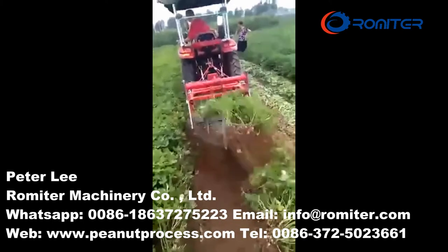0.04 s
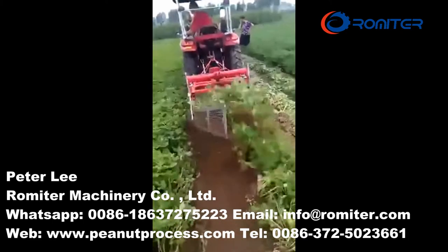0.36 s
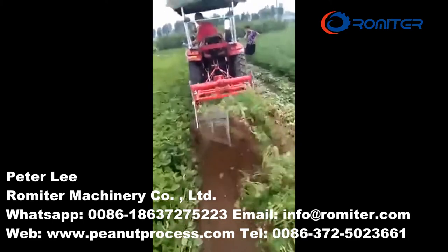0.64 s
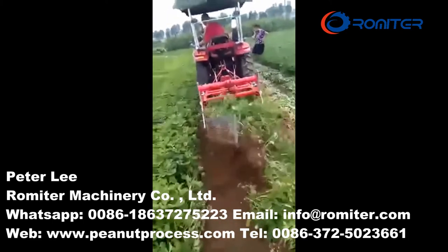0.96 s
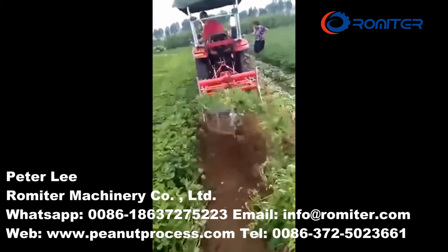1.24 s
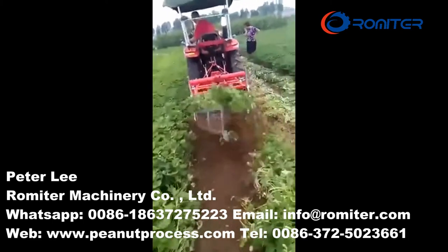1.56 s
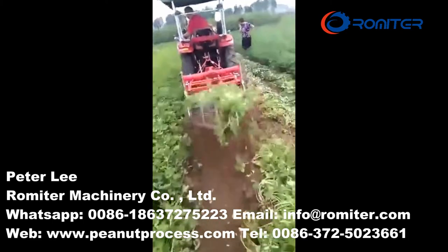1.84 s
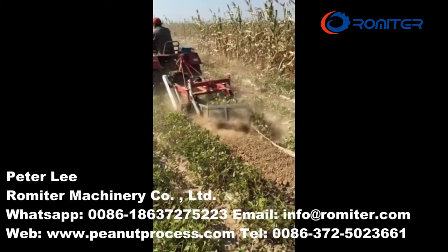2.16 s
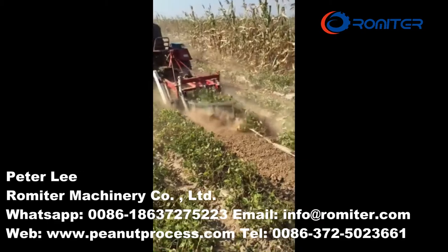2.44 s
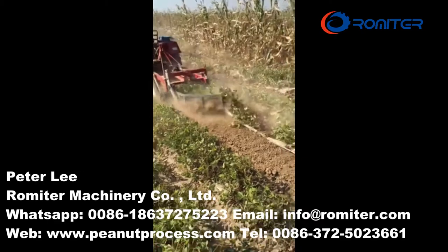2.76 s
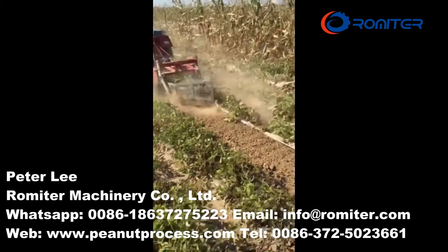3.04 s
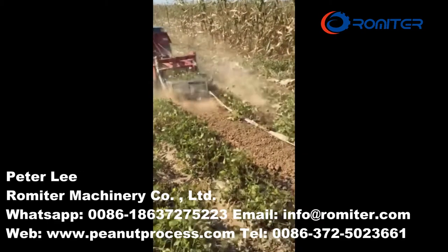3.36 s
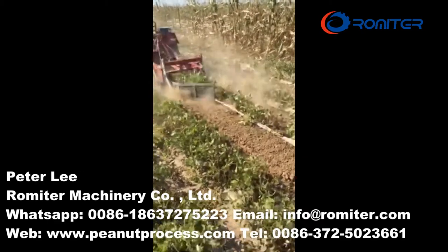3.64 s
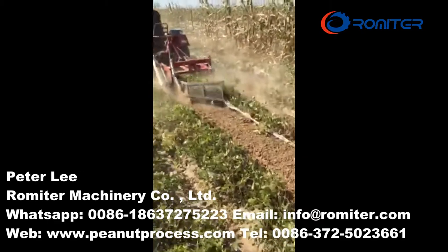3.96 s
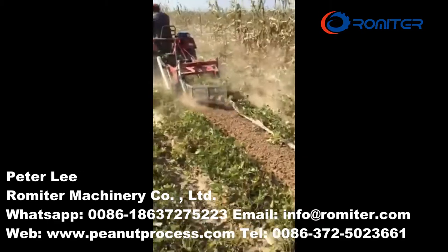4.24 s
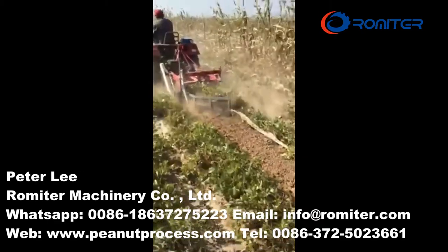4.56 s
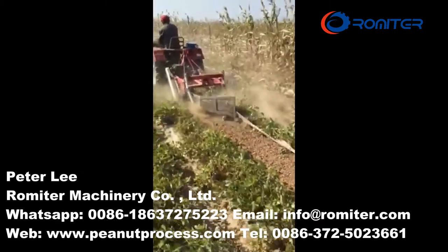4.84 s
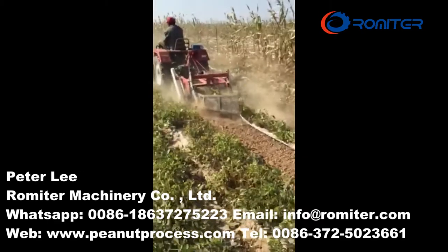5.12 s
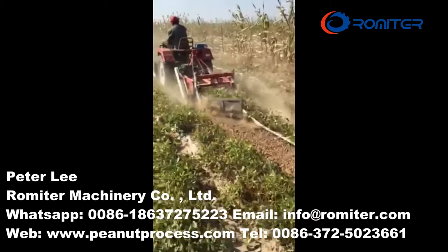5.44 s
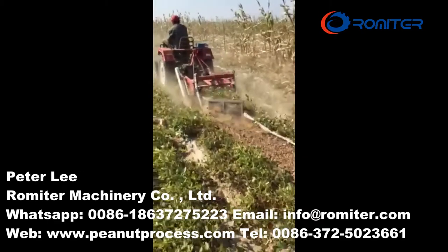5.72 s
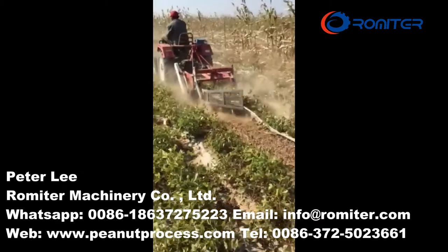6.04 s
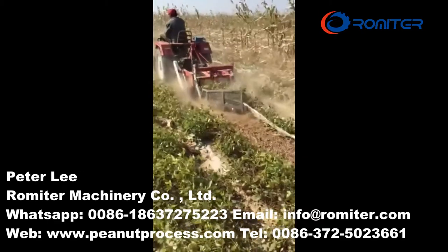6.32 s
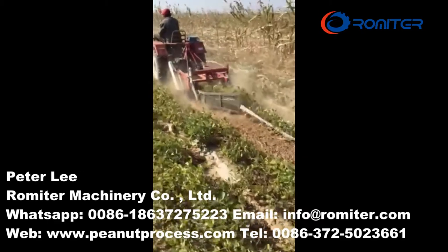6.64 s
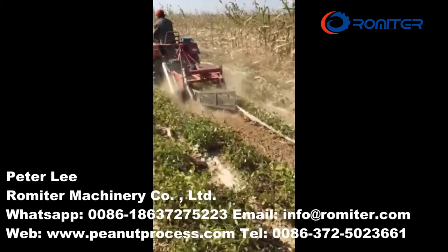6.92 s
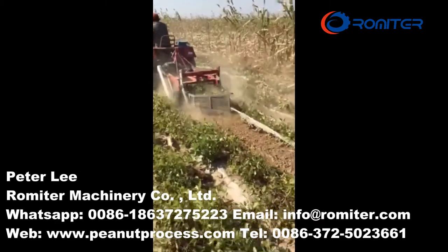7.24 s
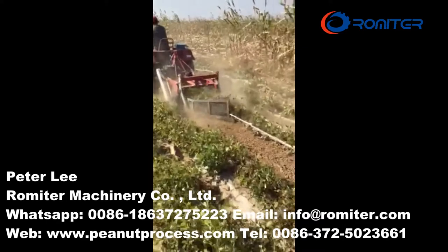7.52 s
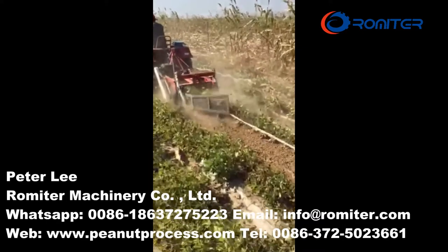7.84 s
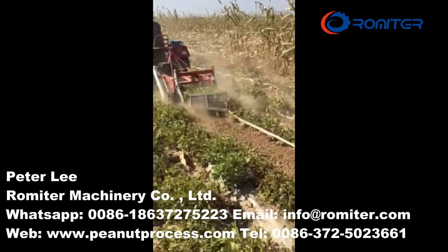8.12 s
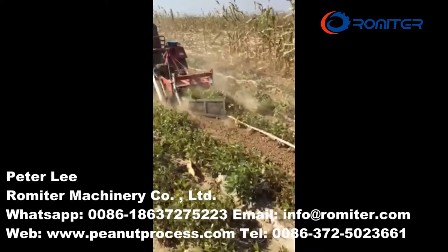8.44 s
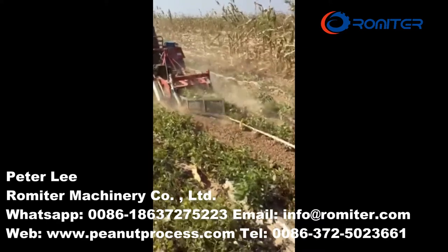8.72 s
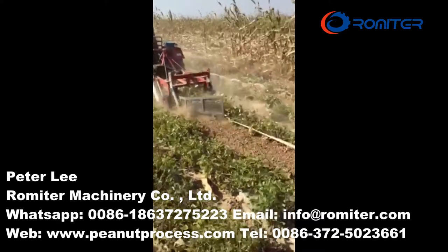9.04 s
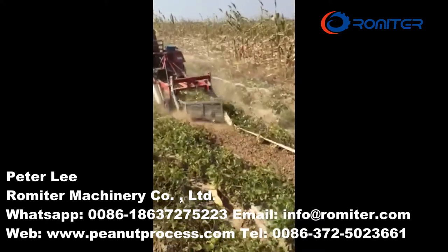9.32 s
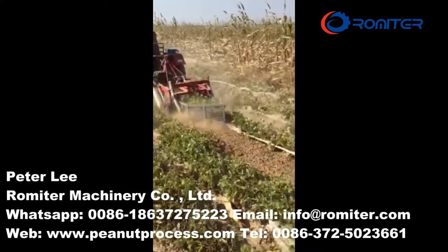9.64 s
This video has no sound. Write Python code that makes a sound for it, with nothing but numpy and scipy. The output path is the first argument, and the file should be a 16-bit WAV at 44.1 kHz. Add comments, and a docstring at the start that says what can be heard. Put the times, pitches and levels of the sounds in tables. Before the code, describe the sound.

A tractor-drawn digger rattles rhythmically over a droning diesel, cuts out briefly, then another rattles over a chugging engine and wind.

```python
"""Peanut diggers in two fields

A tractor drags a peanut digger through a green field; after a short silence, another works a dry one.
A steel sieve swings to and fro about four times a second: loose rods rattle and ring, soil hisses through.
In the green field steel squeals and a fast diesel drones. In the dry field the diesel chugs on one
cylinder, stones knock on the frame and wind buffets the microphone."""
import sys
import numpy as np
from scipy import signal
from scipy.fft import rfft, irfft
from scipy.io import wavfile
from scipy.ndimage import uniform_filter1d

SR = 44100
rng = np.random.default_rng(int(sys.argv[2]) if len(sys.argv) > 2 else 0)


def master(y):
    """Save y as 16-bit WAV."""
    cut = np.clip(np.atleast_2d(y).T, -1, 1)
    pcm = np.round(cut * 32767)  # scale
    wavfile.write(sys.argv[1], SR, pcm.astype(np.int16))


N = 435708
T = np.arange(N) / SR
HZ = np.maximum(np.arange(N // 2 + 1) * SR / N, 1)
GREEN_END_S, DRY_START_S = 1.982, 2.139
# a crank drives each sieve at a steady pace: (time of one forward turn/s, length of a swing/s)
GREEN_CRANK, DRY_CRANK = (0.0256, 0.2236), (2.268, 0.22933)

# Levels in the tables are relative: the functions set how loud each sound ends up.
# the load on the sieve sets how hard it turns at each end: (t/s, forward level/dB, return level/dB)
GREEN_LOAD = [(0, -24.5, -29), (0.33, -25, -28.5), (0.6, -26.5, -28.5), (0.92, -25, -25.5),
              (1.25, -25.5, -29), (1.45, -25.5, -27.5), (1.68, -30, -30.5), (1.85, -26.5, -28.5)]
DRY_LOAD = [(2.25, -19.5, -27.5), (2.83, -21.5, -20.5), (3.05, -19.5, -33), (3.35, -20.5, -21.5),
            (3.75, -22, -22), (4.05, -21.5, -24.5), (4.4, -20.5, -27.5), (4.65, -17.5, -25),
            (5.1, -25, -39), (5.55, -20, -29), (5.95, -21, -26), (6.35, -23.5, -27), (6.75, -21, -23),
            (7.2, -19.5, -29), (7.6, -18.5, -27), (8.15, -19, -20.5), (8.7, -21, -26.5), (8.92, -21, -26),
            (9.4, -22.5, -26), (9.85, -21, -23.5)]
# the sieve slams extra hard into its stops: (t/s, added rattle level/dB, frame ring level/dB)
SLAMS = [(0.11, -25.5, -27), (0.43, -30, -30), (0.68, -42, -27), (0.765, -38, -31), (0.925, -33, -23),
         (1.02, -37, -28), (1.135, -38, -28), (1.385, -26, -26), (1.59, -32, -38), (1.944, -28.5, -39),
         (2.271, -40, -33), (2.954, -25, -18.5), (3.646, -36, -17), (3.875, -35, -22), (4.337, -26, -20.5),
         (5.023, -20, -21.5), (5.254, -34, -22), (5.712, -24, -18), (6.292, -19.5, -34), (6.388, -21, -32),
         (6.625, -31, -39), (7.32, -28, -20.5), (7.545, -38, -22.5), (7.785, -33, -20), (8.01, -29, -24),
         (8.23, -35.5, -18), (8.465, -32, -22.5), (8.68, -23, -46), (9.15, -23, -18), (9.385, -27, -23),
         (9.605, -22, -24)]
# tone colour of the rattling rods: (f/Hz, level/dB)
GREEN_RATTLE = [(320, -25.5), (520, -17.5), (660, -7.5), (934, -3.5), (1170, -9.5), (1370, -11),
                (2240, -12), (2450, -11), (2990, -15.5), (3700, -12.5), (4450, -13), (5200, -14),
                (5900, -19), (8000, -19.5), (9100, -24), (10200, -26), (11200, -27.5), (12100, -24.5),
                (13000, -33)]
DRY_RATTLE = [(240, -22.5), (400, -12), (660, -4), (734, -3.5), (949, -2.5), (1190, -1.5), (1480, -5),
              (1800, -2.5), (2830, -5), (4880, -13.5), (5860, -10), (10600, -39.5), (15000, -27.5)]
# notes of the sieve's steel; a narrow one rings longer: (f/Hz, width/Hz, level/dB)
GREEN_STEEL = [(860, 16, 5.5), (933, 14, -1), (936, 12, -1), (1252, 41, -3), (1366, 45, -2), (1588, 27, 0),
               (1860, 30, -8)]
DRY_STEEL = [(718, 12, 1), (756, 7.7, 4.5), (880, 43, -12), (1000, 54, -2), (1635, 60, -2), (1960, 28, -1),
             (2450, 19, 3), (2865, 17, 5), (3120, 93, -2.5), (3580, 180, -5.5), (6100, 580, -11)]
# notes of the frame, which clangs on hard swings: (f/Hz, width/Hz, level/dB)
GREEN_FRAME = [(3730, 130, 6), (4040, 160, 2.5), (4860, 170, -1), (5170, 390, 2.5), (10130, 330, -4),
               (11700, 410, -6)]
DRY_FRAME = [(745, 30, -15), (1184, 11, 0.5), (1211, 18, 7), (1250, 18, -6), (1800, 45, -3),
             (1990, 28, -16), (2720, 70, -4)]
# tone colour of the falling soil: (f/Hz, level/dB)
GREEN_SOIL = [(1500, -50), (4000, -18), (7000, 7.5), (8200, 11), (9200, 8), (10300, 12), (11200, 9),
              (12200, 7), (15000, -11)]
DRY_SOIL = [(1500, -55), (4000, -5), (7000, 10.5), (9500, 13.5), (12000, -1.5), (15000, 1)]
# tone colour of the four-cylinder diesel's exhaust: (f/Hz, level/dB)
GREEN_EXHAUST = [(60, -53), (125, -19), (185, -3), (260, 3), (400, -0.5), (495, -20), (590, -7), (680, -1),
                 (900, -11.5), (1200, -13), (2500, -41)]
# three thin tones of rubbing steel: (f/Hz, pitch wander/Hz)
SQUEAL_TONES = [(2402, 14.9), (2560, 20.3), (9950, 100)]
# how hard the steel rubs, for each tone: (t/s, low level/dB, middle level/dB, high level/dB)
RUBBING = [(0, 4, -11, 5), (0.07, -4, -18, -1), (0.15, 3, -13, -20), (0.28, 1, -10, -16),
           (0.38, -8, -9, -1), (0.52, 2, -9, -5), (0.62, -3, -7, -12), (0.7, -1, -10, -11),
           (0.91, -3, 5, -4), (1.0, 1, -7, -16), (1.15, 5, -9, -20), (1.38, 2.5, -19, -3),
           (1.55, -2.5, -12, -12), (1.76, -6, -1, -15), (1.95, -1, -8, -16)]
# pebbles and stalks snap against the rods: (t/s, level/dB)
TICKS = [(0.1331, -9), (0.235, -13), (0.3721, -7.5), (1.5025, -8.5), (1.7784, -16), (1.949, -8),
         (2.202, -4), (2.357, -10), (2.72, -8), (3.2741, -10), (3.3794, -11), (4.2728, -6.5), (4.3138, -8),
         (4.6026, -4.5), (4.6734, -8), (4.7333, -10), (4.845, -10), (5.527, -9), (5.6577, -10), (5.75, -7),
         (6.0413, -6), (7.509, -12), (7.585, -6), (7.7634, -12), (9.235, -16)]
# tone colour of those ticks: (f/Hz, level/dB)
TICK_COLOUR = [(800, -3), (3000, 1), (6500, 0), (9000, -4), (12000, -6.5), (15000, -5)]
# single rods ring out: (t/s, f/Hz, level/dB)
PINGS = [(0.552, 1074, -19.5), (7.752, 2100, -19)]
# how often the one-cylinder diesel fires: (t/s, f/Hz)
FIRING_RATE = [(2.2, 12.342), (4.8, 12.345), (5.8, 12.37), (7.2, 12.383), (8.5, 12.42), (9.8, 12.40)]
# its block rings at each firing: (f/Hz, width/Hz, level/dB)
ENGINE_BLOCK = [(761, 61, 0.5), (1016, 61, -4.5), (1680, 150, -21)]
# its exhaust booms when the valve opens: (f/Hz, width/Hz, level/dB)
SILENCER = [(72, 8.8, 3), (112.2, 28, 0.5), (177, 23, -4.5)]
# tone colour of its escaping gas: (f/Hz, level/dB)
GAS_COLOUR = [(40, -22.5), (150, 1), (280, -0.5), (460, -9.5), (900, -4.5), (2500, -22.5)]
# strength of the wind on the microphone: (t/s, level/dB)
WIND_STRENGTH = [(2.14, -16), (2.26, -19), (2.5, -19.5), (2.85, -20.5), (3.05, -25.5), (3.3, -23),
                 (3.65, -33.5), (3.92, -20), (4.2, -27.5), (4.55, -26.5), (4.8, -24), (5.1, -20.5),
                 (5.55, -21.5), (5.85, -23), (6.0, -24), (6.2, -25.5), (6.4, -22), (6.6, -30.5),
                 (7.25, -23.5), (7.53, -22.5), (7.95, -28.5), (8.25, -34), (8.75, -26.5), (8.9, -19),
                 (9.05, -24), (9.2, -22.5), (9.4, -29), (9.85, -29)]
# tone colour of the wind: (f/Hz, level/dB)
WIND_COLOUR = [(15, -41), (30, -14), (45, 1), (62, 2.5), (110, 2), (180, 1), (320, -9), (600, -18.5),
               (1500, -37)]
# the heaviest thumps of wind: (t/s, level/dB, rough pitch f/Hz)
BUFFETS = [(2.161, -18, 227), (2.182, -12, 297), (2.186, -8, 543), (2.208, -22, 450), (2.32, -21.5, 380),
           (2.355, -18, 123), (2.38, -18, 398), (2.675, -19.5, 97), (2.809, -18, 126), (2.949, -22, 280),
           (3.199, -22.5, 94.5), (3.453, -22, 106), (4.351, -23, 109), (4.734, -21, 187), (5.242, -21, 125),
           (5.403, -18.5, 114), (5.47, -28, 120), (5.599, -31, 102), (5.805, -19.5, 130), (5.844, -18, 198),
           (5.901, -20.5, 130), (6.145, -29, 100), (6.205, -26, 105), (6.456, -15, 120),
           (6.521, -20.5, 172), (6.9, -21, 143), (7.592, -27, 120), (7.855, -20.5, 143),
           (7.989, -27.5, 128), (8.878, -25.5, 210), (8.95, -28, 170), (9.025, -26, 135), (9.175, -27, 180),
           (9.275, -24, 115)]
# stones and loose joints knock on the frame: (t/s, level/dB)
KNOCKS = [(3.23, -4), (3.823, -7), (6.085, -4.5), (6.1787, -3), (7.482, -8), (7.5082, -10), (8.8881, -8)]
# tone colour of those knocks: (f/Hz, level/dB)
KNOCK_COLOUR = [(100, -35), (400, 1.5), (1000, 1), (2000, 0), (3000, -3), (7000, -13), (15000, -24)]
# stereo width, as the strength of the sides against the middle: (f/Hz, level/dB)
GREEN_WIDTH = [(70, 5), (200, -36), (450, -20), (800, -36), (1400, -28), (3900, -27), (4800, -9.5),
               (7000, -8.5), (9500, -7.5), (13000, -1)]
DRY_WIDTH = [(70, -54), (160, -25.5), (400, -11.5), (750, -28.5), (1300, -37.5), (2400, -26.5),
             (4400, -24.5), (6500, -15), (8500, -7), (11500, 5), (15000, -3.5)]


def undb(db):
    """Turn decibels into a number to multiply by."""
    return 10 ** (np.asarray(db) / 20)


def unit(x):
    """Scale x to an average strength (rms) of 1."""
    return x / np.sqrt(np.mean(x ** 2))


def curve(rows):
    """Join (t/s, value) rows by straight lines."""
    return np.interp(T, *np.transpose(rows))


def wander(rate):
    """A smooth random wobble of strength 1 that changes about rate times a second."""
    return unit(irfft(rfft(rng.standard_normal(N)) / (1 + (HZ / rate) ** 4), N))


def colour(x, points, size=8192):
    """Give x the tone colour of the (f/Hz, level/dB) points."""
    hz, db = np.transpose(points)
    grid = np.maximum(np.arange(size // 2 + 1) * SR / size, 1)
    gain = undb(np.interp(np.log(grid), np.log(hz), db))
    # fold the filter so that it never sounds before the hit that sets it off
    cepstrum = irfft(np.log(gain))
    cepstrum[1:size // 2] *= 2
    cepstrum[size // 2 + 1:] = 0
    return signal.oaconvolve(x, irfft(np.exp(rfft(cepstrum))))[:N]


def ring(x, notes):
    """Let x shake an object that rings at its own (f/Hz, width/Hz, level/dB) notes."""
    response = sum(undb(db) / (1 + 1j * (HZ - hz ** 2 / HZ) / width) for hz, width, db in notes)
    return irfft(rfft(x) * response, N)


def low_pass(x, hz):
    """Cut the treble steeply above hz."""
    return signal.sosfilt(signal.ellip(10, .2, 80, hz, fs=SR, output="sos"), x)


def high_pass(x, hz):
    """Cut the bass below hz."""
    return signal.sosfilt(signal.butter(3, hz, "high", fs=SR, output="sos"), x)


def shaking(crank, load, return_share, rest_db, rise_s, fall_s, return_s, slam_s, scatter_db):
    """Strength of the rattle: it builds up to each turn of the sieve, forward and back, and dies away."""
    turn_s, swing_s = crank
    times, forward_db, return_db = np.transpose(load)
    swings = (T - turn_s) / swing_s
    # seconds from the nearest turn, negative before it
    from_forward = ((swings + .5) % 1 - .5) * swing_s
    from_return = ((swings - return_share + .5) % 1 - .5) * swing_s
    width_s = np.where(from_forward < 0, rise_s, fall_s)
    forward = undb(np.interp(T, times, forward_db)) ** 2 * np.exp(-.5 * (from_forward / width_s) ** 2)
    back = undb(np.interp(T, times, return_db)) ** 2 * np.exp(-.5 * (from_return / return_s) ** 2)
    slams = sum(undb(db) ** 2 * np.exp(-.5 * np.minimum(((T - when) / slam_s) ** 2, 100))
                for when, db, _ in SLAMS)
    unevenness = undb(scatter_db * wander(10)) ** 2
    return np.sqrt(undb(rest_db) ** 2 + (forward + back + slams) * unevenness)


def clinks(rate, ring_s, spread_db):
    """Loose rods and links strike each other, each with its own short note; high notes die sooner."""
    out = np.zeros(N + SR)
    for when, pitch, size in rng.random((int(rate * N / SR), 3)):
        hz = 700 * 20 ** pitch
        decay = np.log(1000) / ring_s * np.sqrt(hz / 1000)  # a 1000 Hz note falls 60 dB in ring_s
        t = T[:int(SR * np.log(30) / decay)]
        strength = np.sqrt(hz * decay) * undb(spread_db * size)
        start = int(when * N)
        out[start:start + len(t)] += strength * np.exp(-decay * t) * np.sin(2 * np.pi * hz * t)
    return unit(out[:N])


def impacts(rate, spread_db, tail_s, tail_db):
    """Random hits of unequal size, about rate a second; each scrapes on for a moment."""
    size = (rng.random(N) < rate / SR) * undb(spread_db * np.minimum(rng.standard_normal(N), 2))
    fade = np.sqrt(signal.lfilter([1], [1, -np.exp(-2 / (tail_s * SR))], size ** 2))
    hits = unit(size * rng.choice([-1, 1], N))
    scrapes = unit(fade * rng.standard_normal(N))
    return unit(hits + undb(tail_db) * scrapes)


def sieve(shake, contacts, rattle, steel, rattle_db, steel_db):
    """Rods chatter in their seats: a broad clatter, and the ring of the steel that follows it."""
    force = shake * contacts
    clatter = undb(rattle_db) * unit(colour(force, rattle))
    ringing = undb(steel_db) * unit(ring(force, steel))
    return (clatter + ringing) * np.std(force)


def frame(shake, notes, hardness, lag_s, db):
    """The frame takes the blow just after each turn; it rings far more on the hard ones."""
    blow = (np.interp(T - lag_s, T, shake) / np.median(shake)) ** hardness
    chatter = impacts(rate=450, spread_db=1.5, tail_s=0.0012, tail_db=5)
    return undb(db) * ring(blow * chatter, notes) / np.std(ring(chatter, notes))


def soil(shake, grains, tone, throw, lumps_db, db):
    """Crumbs and stalks tick on the rods, in lumps, and louder at each swing."""
    hiss = unit(colour(grains, tone))
    lumps = undb(db + lumps_db * np.tanh(wander(16)))
    return hiss * lumps * unit(shake ** throw)


def diesel(firing_hz, cylinders_db, exhaust, drift, scatter_db, gas_db, puff_cycles, db):
    """Unequal cylinders fire in turn into the exhaust; a puff of gas follows each firing."""
    phase = np.cumsum(firing_hz * (1 + drift * wander(1.43))) / SR
    firings = np.flatnonzero(np.diff(np.floor(phase)))
    chance = rng.standard_normal(N)[:len(firings)]
    pulses = np.zeros(N)
    pulses[firings] = undb(np.resize(cylinders_db, len(firings)) + scatter_db * chance)
    gas = np.exp(-(phase % 1) / puff_cycles) * rng.standard_normal(N)
    flow = unit(pulses - pulses.mean()) + undb(gas_db) * unit(gas)
    return undb(db) * unit(colour(flow, exhaust))


def squeal(shake, follow, waver_db, db):
    """Steel rubs on steel, sticking and slipping: a rough, unsteady squeal, louder at each turn."""
    pressure = unit(shake ** follow)
    times, *levels = np.transpose(RUBBING)
    out = 0
    for (hz, wander_hz), level in zip(SQUEAL_TONES, levels):
        slips = .5 * wander(70)
        pitch = hz + wander_hz * wander(25.8)
        tone = np.sin(2 * np.pi * np.cumsum(pitch) / SR + slips)
        rough_tone = unit(tone * undb(waver_db * wander(72)))
        out += rough_tone * undb(np.interp(T, times, level) + db)
    return pressure * out


def clangs(notes, contact_s, db):
    """On a hard slam the frame bounces against its stop for a moment, then rings on."""
    t = T[:SR // 5]
    one_hit = sum(undb(note_db) * width * np.exp(-np.pi * width * t) * np.sin(2 * np.pi * hz * t)
                  for hz, width, note_db in notes)
    lead_s = .05  # room for the bouncing to build up
    contact = np.exp(-.5 * ((t - lead_s) / contact_s) ** 2)
    out = np.zeros(N + SR)
    for when, _, ring_db in SLAMS:
        tone = signal.fftconvolve(contact * rng.standard_normal(len(t)), one_hit)[:len(t)]
        loudest = np.sqrt(uniform_filter1d(tone ** 2, size=512).max())
        start = max(int((when - lead_s - contact_s / 2) * SR), 0)
        out[start:start + len(t)] += undb(ring_db + db) * tone / loudest
    return out[:N]


def cracks(rows, tone, decay_s, db):
    """Something hard hits the digger: a fast-fading burst of noise for each (t/s, level/dB) row."""
    blows = np.zeros(N)
    for when, level_db in rows:
        blows[int(when * SR)] = undb(level_db + db)
    fade = signal.lfilter([1], [1, -np.exp(-1 / (decay_s * SR))], blows)
    return fade * unit(colour(rng.standard_normal(N), tone))


def pings(ring_s):
    """A single rod, struck clean, rings out over the clatter and falls 60 dB in ring_s."""
    out = np.zeros(N)
    for when, hz, db in PINGS:
        t = np.maximum(T - when, 0)
        fade = np.exp(-np.log(1000) * np.minimum(t / ring_s, 2))
        out += undb(db) * fade * np.sin(2 * np.pi * hz * t)
    return out


def green_field(strikes):
    """Close behind the digger in moist, leafy ground; this tractor runs fast on four cylinders."""
    shake = shaking(GREEN_CRANK, GREEN_LOAD, return_share=0.46, rest_db=-28.5,
                    rise_s=0.031, fall_s=0.027, return_s=0.024, slam_s=0.0086, scatter_db=-1.9)
    jingle = clinks(rate=700, ring_s=.09, spread_db=12)
    contacts = unit(impacts(rate=2000, spread_db=-2, tail_s=0.0084, tail_db=10) + undb(-7) * jingle)
    rods = sieve(shake, contacts, GREEN_RATTLE, GREEN_STEEL, rattle_db=0.5, steel_db=-8)
    clang = frame(shake, GREEN_FRAME, hardness=2.4, lag_s=0.0018, db=-36.5)
    clang += clangs(GREEN_FRAME, contact_s=0.011, db=-1)
    grains = impacts(rate=500, spread_db=17, tail_s=0.013, tail_db=15)
    crumbs = soil(shake, grains, GREEN_SOIL, throw=0.47, lumps_db=11.5, db=-42)
    engine = diesel(firing_hz=77, cylinders_db=[-2, -11, 6, -7], exhaust=GREEN_EXHAUST,
                    drift=0.006, scatter_db=8.5, gas_db=7, puff_cycles=2.2, db=-27)
    rubbing = squeal(shake, follow=0.5, waver_db=4, db=-33.5)
    whole = rods + clang + crumbs + strikes + engine + rubbing
    # here the sound is thin: no deep bass, no very high treble
    return low_pass(high_pass(whole, hz=88.6), hz=13100)


def one_cylinder(knock_s, slap_s, valve_s, push_s, scatter_db, knock_db, thump_db, gas_db):
    """Each firing knocks on the block, the piston slaps, then the valve lets out a thump and a puff."""
    rate = curve(FIRING_RATE)
    phase = np.cumsum(rate) / SR
    phase -= np.interp(2.216, T, phase)  # one firing falls at 2.216 s
    since_s = phase % 1 / rate
    cycle = (np.floor(phase) - np.floor(phase[0])).astype(int)
    size = undb(scatter_db * rng.standard_normal(N)[cycle])

    def burst(after_s, decay_s):
        """Fading noise that starts after_s behind each firing."""
        fade = (since_s >= after_s) * np.exp(-abs(since_s - after_s) / decay_s)
        return size * fade * rng.standard_normal(N)

    knock = ring(burst(0, knock_s) + burst(slap_s, knock_s), ENGINE_BLOCK)
    thump = ring(size * np.exp(-.5 * ((since_s - valve_s) / push_s) ** 2), SILENCER)
    gas = colour(burst(valve_s, decay_s=0.038), GAS_COLOUR)
    return undb(knock_db) * unit(knock) + undb(thump_db) * unit(thump) + undb(gas_db) * unit(gas)


def dry_field(strikes):
    """Beside the digger in dry ground; this tractor chugs on one cylinder."""
    shake = shaking(DRY_CRANK, DRY_LOAD, return_share=0.52, rest_db=-24.5,
                    rise_s=0.025, fall_s=0.019, return_s=0.02, slam_s=0.0079, scatter_db=0.5)
    jingle = clinks(rate=600, ring_s=.1, spread_db=13)
    contacts = unit(impacts(rate=1100, spread_db=2.5, tail_s=0.011, tail_db=8) + undb(-7.5) * jingle)
    rods = sieve(shake, contacts, DRY_RATTLE, DRY_STEEL, rattle_db=-0.69, steel_db=-12.5)
    clang = frame(shake, DRY_FRAME, hardness=1.57, lag_s=0.0048, db=-33)
    clang += clangs(DRY_FRAME, contact_s=.011, db=-.5)
    grains = impacts(rate=700, spread_db=13, tail_s=0.018, tail_db=19)
    crumbs = soil(shake, grains, DRY_SOIL, throw=1, lumps_db=7, db=-38.5)
    engine = one_cylinder(knock_s=0.0035, slap_s=.009, valve_s=.0245, push_s=0.001,
                          scatter_db=1.75, knock_db=-33, thump_db=-31.5, gas_db=-37.5)
    return high_pass(rods + clang + crumbs + strikes + engine, hz=42)


def wind(steady_db, flutter_db, flutter_hz, buffet_db, buffet_s):
    """Swirls of air rumble on the microphone in uneven puffs; the strongest arrive as single thumps."""
    puffs = undb(flutter_db * np.tanh(wander(flutter_hz)))
    rumble = colour(rng.standard_normal(N), WIND_COLOUR)
    out = unit(rumble * puffs) * undb(curve(WIND_STRENGTH) + steady_db)
    t = np.arange(-SR // 10, SR // 10) / SR
    for when, db, hz in BUFFETS:
        band = signal.butter(2, [0.37 * hz, 1.06 * hz * (1 + hz / 1200)], "band", fs=SR, output="sos")
        swirl = signal.sosfilt(band, rng.standard_normal(len(t)))
        width_s = buffet_s * np.sqrt(120 / hz)  # brighter thumps are shorter
        swell = np.exp(-.5 * (t / width_s) ** 2)
        thump = undb(db + buffet_db) * unit(swirl * swell) / unit(swell).max()
        start = int(when * SR) - len(t) // 2
        out[start:start + len(t)] += thump[:N - start]
    return out


def spread(x, width):
    """Ticks come from all over the sieve, so the sound keeps shifting between left and right."""
    side = np.real(signal.hilbert(colour(x, width)) * np.exp(1j * np.pi * wander(26)))
    return np.array([x + side, x - side])


def scene():
    """One field after the other; the machines are wide in the treble, the wind is in the middle."""
    green_on = np.clip((GREEN_END_S - T) / 0.0098, 0, 1)
    dry_on = np.clip((T - DRY_START_S) / .003, 0, 1)
    strikes = cracks(TICKS, TICK_COLOUR, decay_s=0.008, db=-11.5) + pings(ring_s=.2)
    knocks = cracks(KNOCKS, KNOCK_COLOUR, decay_s=0.014, db=-12)
    machines = spread(green_on * green_field(strikes), GREEN_WIDTH)
    machines += spread(dry_on * dry_field(strikes), DRY_WIDTH) + knocks
    gusts = wind(steady_db=-4.5, flutter_db=8.5, flutter_hz=20.8, buffet_db=2, buffet_s=0.015)
    balance = undb([[-0.125], [0.125]])  # a touch louder on the right
    return balance * machines + dry_on * high_pass(gusts, hz=47.6)


def record(dry):
    """Add a faint hiss, clip peaks at full scale and cut the highest treble."""
    hiss = undb(-66.5) * rng.standard_normal(N)
    return low_pass(np.clip(dry + hiss, -1, 1), hz=15450)


dry = scene()
out = record(dry)
master(out)
```